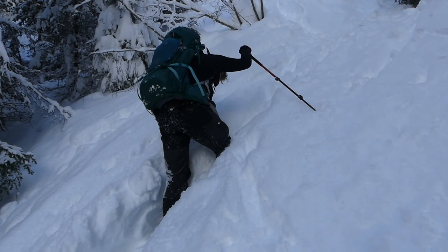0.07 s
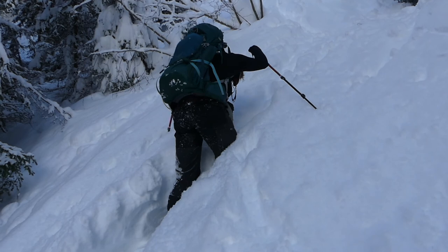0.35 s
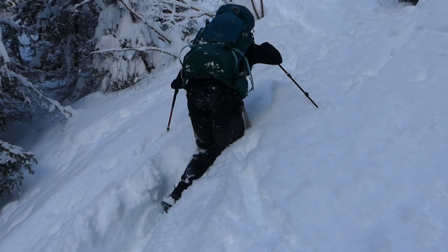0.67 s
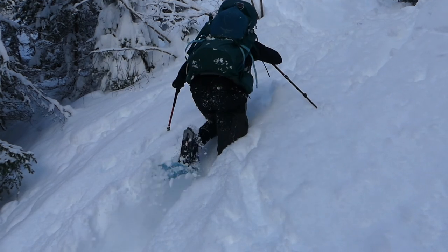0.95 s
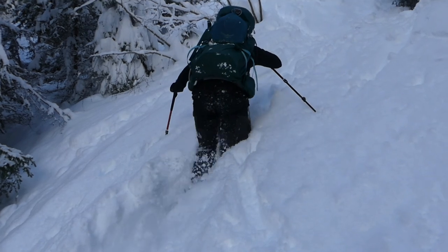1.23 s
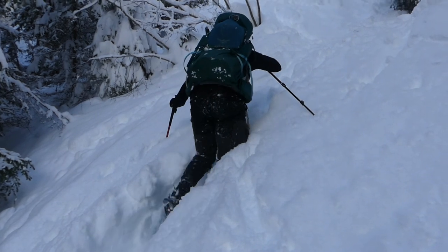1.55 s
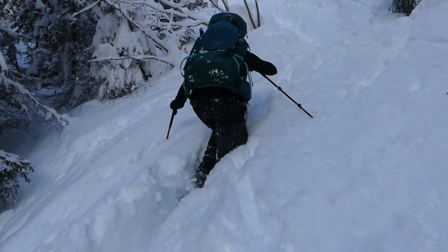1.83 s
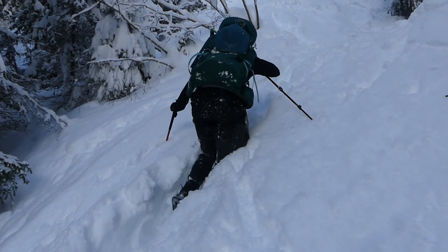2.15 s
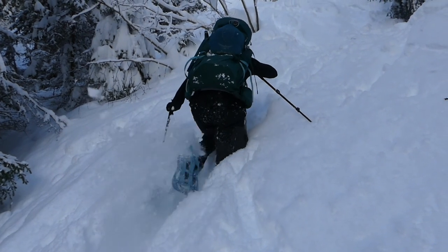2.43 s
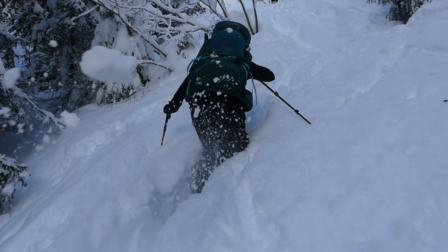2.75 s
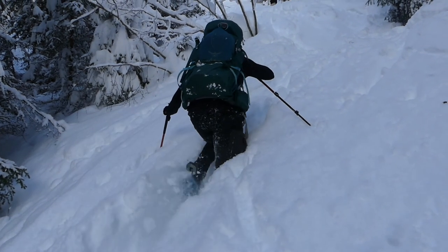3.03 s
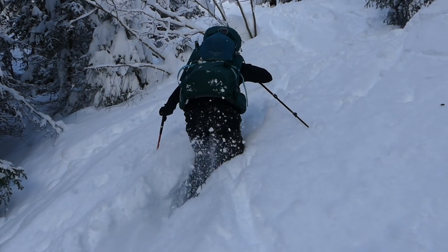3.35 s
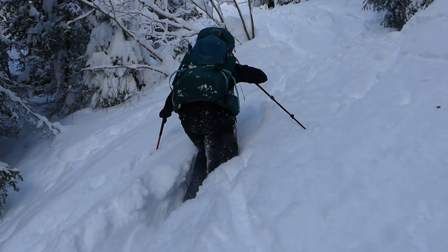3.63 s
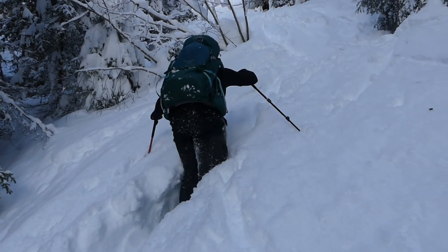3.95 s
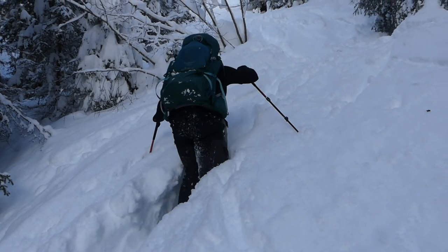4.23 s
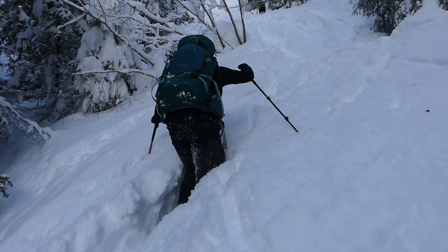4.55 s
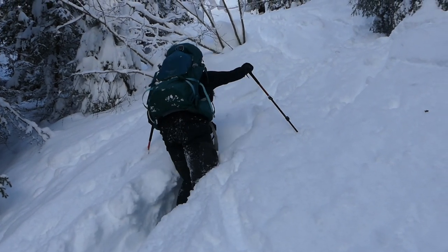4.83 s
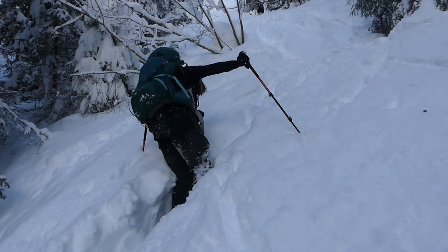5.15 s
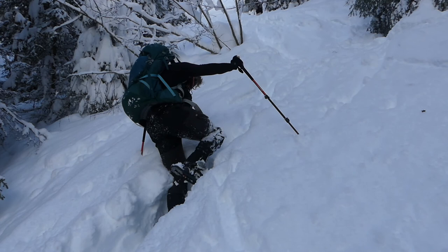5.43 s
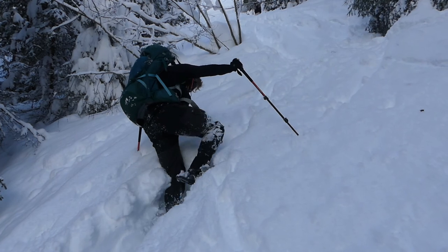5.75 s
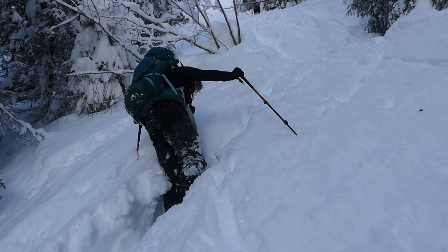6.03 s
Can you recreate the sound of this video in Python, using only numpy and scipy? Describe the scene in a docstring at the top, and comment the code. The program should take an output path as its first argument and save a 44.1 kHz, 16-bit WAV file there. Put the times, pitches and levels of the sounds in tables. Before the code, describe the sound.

In quiet, echoless woods, uneven snowshoe steps pack deep snow and break its crust, sending powder hissing down the slope. Clods land close by with short, crumbly thuds, and snow rubs hollowly on the microphone about a second in. Midway, two lumps strike the microphone's casing in sharp, briefly ringing knocks, the loudest sounds. A couple more strong thuds follow, then the soft crunching continues over a faint, even rush.

```python
"""A deep snow slope in still woods: a hiker on snowshoes climbs a few metres above the camera.
Each step packs the snow with a low crunch, breaks its crust and throws powder that hisses downhill,
all of it countless tiny grains giving way. Kicked-back clods thud and crumble close to the microphone.
Snow rubs along the camera's hollow shell, and later two hard lumps shatter on it and make it ring.
A faint, even rush lies underneath."""
import sys
import numpy as np
from scipy import signal
from scipy.fft import rfft, irfft, next_fast_len
from scipy.io import wavfile
from scipy.ndimage import uniform_filter1d

SR = 44100
rng = np.random.default_rng(int(sys.argv[2]) if len(sys.argv) > 2 else 0)


def digitize_waveform(pressure):
    """Quantize a signal to 16-bit integers and store it at the path in sys.argv[1].

    Rows of a 2-D input are taken as channels; values are limited to [-1, 1].
    """
    field = np.atleast_2d(pressure).T
    bounded = np.clip(field, -1, 1)
    quanta = np.round(bounded * 32767).astype(np.int16)
    wavfile.write(sys.argv[1], SR, quanta)


N = 272979
PADDED = next_fast_len(N, real=True)
HZ = np.arange(PADDED // 2 + 1) * SR / PADDED
T = np.arange(N) / SR
HIT_T = np.arange(4096) / SR  # time axis of one short hit


def undb(db):
    """Decibels to gain."""
    return 10 ** (np.asarray(db) / 20)


def unit(x):
    """Scale to rms 1."""
    return x / np.sqrt(np.mean(x ** 2))


def hit_level(x, db):
    """Scale a hit to the energy of 10 ms at this level."""
    return x * undb(db) * np.sqrt((SR // 100) / np.sum(x ** 2))


def over_hz(hz, points_hz, values):
    """Join points by straight lines on a log-frequency axis."""
    return np.interp(np.log(hz + 1), np.log(points_hz), values)


def colour(x, eq, size=2048):
    """Minimum-phase EQ through (Hz, dB) points, so nothing rings ahead of an attack."""
    hz = np.arange(size // 2 + 1) * SR / size
    cepstrum = irfft(np.log(undb(over_hz(hz, *np.transpose(eq)))))
    cepstrum[1:size // 2] *= 2
    cepstrum[size // 2 + 1:] = 0
    return signal.oaconvolve(x, irfft(np.exp(rfft(cepstrum))))[:len(x)]


def wander(rate_hz):
    """Smooth random modulation with a spread near 1."""
    hold = int(SR / rate_hz)
    stairs = np.repeat(rng.standard_normal(N // hold + 1), hold)
    return 1.2 * uniform_filter1d(stairs, hold)[:N]


def add(track, start, sound):
    """Mix a sound in at a start time in seconds."""
    i = int(start * SR)
    track[i:i + len(sound)] += sound[:N - i]


def envelope(start, length, attack_s, release_s):
    """Rise to full level by the start time, hold, then die away."""
    return np.exp(-np.maximum(start - T, 0) / attack_s - np.maximum(T - start - length, 0) / release_s)


def grains(eq, per_s, spread, flicker_db, flicker_hz):
    """Snow grains give way at random, in uneven bunches: a direct and a diffuse stream."""
    bunches = undb(flicker_db * wander(flicker_hz))
    streams = np.zeros((2, N))
    for stream in streams:
        chance, size = rng.random((2, N))
        breaks = chance < per_s / SR
        push = 2 * size[breaks] - 1
        # a positive spread gives many small grains and few large ones
        stream[breaks] = np.sign(push) * undb(-spread * np.log(np.abs(push) + .02))
    return np.array([unit(bunches * colour(stream, eq)) for stream in streams])


# Tone of the background bed. Each row: frequency in Hz, gain in dB.
STILL_EQ = [(25, -26), (50, -11), (95, 4.5), (160, 6), (300, -0.5), (450, 6.5), (640, -15.5), (740, 0.5),
            (830, 8), (960, -8), (1600, -7.5), (3000, -16.5), (7500, -20), (11000, -18), (16000, -24.5)]


def stillness():
    """Woods and camera give a faint rush with a hollow band near 830 Hz: two unrelated streams."""
    return [undb(db + 0.52 * wander(3.8)) * unit(colour(rng.standard_normal(N), STILL_EQ))
            for db in (-58.5, -57)]


# A snowshoe bears down. Each row: start in seconds, length in seconds, packing snow and
# breaking crust in dB before the mix trims.
TREADS = [(0, 0.14, -58.5, -69), (0.188, 0.063, -52, -59), (0.33, 0.32, -49.5, -56), (0.667, .25, -51, -50),
          (1.036, 0.19, -50, -53), (1.294, 0.26, -51.5, -59.5), (1.684, 0.054, -57.5, -55.5),
          (1.818, 0.5, -51.5, -57.5), (2.58, 0.018, -43, -55.5), (2.69, 0.08, -59, -61),
          (2.836, 0.27, -52.5, -59.5), (3.216, 0.04, -45.5, -52.5), (3.525, 0.14, -74, -61),
          (3.842, 0.16, -53, -60), (4.084, 0.33, -58, -65.5), (4.637, 0.043, -57, -61.5),
          (4.774, 0.29, -51.5, -64.5), (4.855, 0.01, -60, -58), (5.141, 0.23, -52.5, -60.5),
          (5.387, 0.21, -58.5, -55), (5.612, 0.058, -53, -59.5), (5.768, .4, -51.5, -56)]


def treads(sag_db_per_s=3):
    """Power envelopes of packing snow and breaking crust: both ease off as the snowshoe settles."""
    pack, crust = np.zeros((2, N))
    for start, length, pack_db, crust_db in TREADS:
        settling = undb(-sag_db_per_s * np.clip(T - start, 0, length))
        load = envelope(start, length, attack_s=0.034, release_s=0.049) * settling
        pack += (undb(pack_db) * load) ** 2
        crust += (undb(crust_db) * load) ** 2
    return pack, crust


# The four layers of a step: low packing crunch, midrange crust, hissing powder, airy spray.
# Each row: frequency in Hz, gain in dB.
PACK_EQ = [(25, -37), (60, -34), (100, 0.5), (150, -1), (220, 2.5), (320, 1), (500, -7), (800, -15),
           (1400, -35.5)]
CRUST_EQ = [(60, -20), (250, -34), (550, 4.5), (1050, 2), (1300, 0.5), (1500, 0), (2050, -1.5), (2700, -17),
            (3400, -34), (7000, -19)]
POWDER_EQ = [(200, -42), (1200, -14.5), (2600, 1), (3600, -4.5), (4600, 0), (5700, 1.5), (6800, -2),
             (7600, -9.5), (9000, -6), (12000, -23)]
SPRAY_EQ = [(1000, -53), (5000, -20), (8000, -2.5), (9400, -9), (10400, 5), (13200, 1.5), (14500, -3),
            (16000, -11.5)]


def steps():
    """Snow packs with a low crunch, the crust breaks, loosened powder slides and sprays."""
    pack, crust = treads()
    powder, spray = showers()
    crust += undb(-2.5) ** 2 * powder  # bits of crust tumble with the powder
    floor = undb([-65.5, -75.5, -72, -70.5])[:, None]  # trodden snow never quite rests
    trims = undb([-0.17, 2, 2.5, 0])[:, None]
    pack, crust, powder, spray = trims * np.sqrt(np.array([pack, crust, powder, spray]) + floor ** 2)
    return (pack * grains(PACK_EQ, per_s=670, spread=2, flicker_db=1.5, flicker_hz=49)
            + crust * grains(CRUST_EQ, per_s=2200, spread=3, flicker_db=1.24, flicker_hz=60)
            + powder * grains(POWDER_EQ, per_s=11000, spread=2.5, flicker_db=1, flicker_hz=70)
            + spray * grains(SPRAY_EQ, per_s=16000, spread=-1, flicker_db=2.1, flicker_hz=70))


def crumble(eq, decay_s, db):
    """A lump collapses in a quickly fading burst of tiny fractures."""
    fractures = rng.choice([-1, 1], len(HIT_T)) * np.exp(-HIT_T / max(decay_s, .0004))
    # flatten the burst's spectrum, so the snow's EQ sets the timbre
    power = uniform_filter1d(np.abs(rfft(fractures)) ** 2, size=40)[1:]
    band_hz = np.arange(1, len(power) + 1) * SR / len(HIT_T)
    flat = colour(fractures, np.column_stack([band_hz, -10 * np.log10(power)]))
    return hit_level(colour(flat, eq), db)


# The weight of a thud. Each row: frequency in Hz, gain in dB.
THUD_EQ = [(20, -48), (45, -11), (75, 13), (120, 2.5), (700, 10), (1500, -9)]


def thud(hz, decay_cycles, db):
    """A soft mass stops: the surface dips and swings back once or twice."""
    cycles = hz * HIT_T
    swing = -np.sin(2 * np.pi * cycles) * cycles * np.exp(-cycles / decay_cycles)
    return hit_level(colour(swing, THUD_EQ), db)


# Clods land close by. Each row: start in seconds, thud level in dB, thud pitch in Hz,
# crunch level in dB, grit level in dB before its trim, crumbling time in seconds.
CLODS = [(.211, -40.5, 231, -45, -60.5, 0.0035), (0.673, -37, 198, -46, -80, 0.0083),
         (.689, -31, 200, -32, -65, 0.0038), (0.745, -45, 220, -43, -87, 0.0029),
         (.97, -54, 400, -48, -53, .003), (1.0438, -38.5, 287, -39.5, -56, 0.0019),
         (1.3582, -38, 271, -68, -71, 0.0011), (1.507, -41, 266, -61.5, -77, 0.0024),
         (1.5153, -44, 107, -52, -85, 0.0017), (1.781, -46.5, 494, -52, -80, .0014),
         (1.829, -43.5, 480, -52, -52, 0.0055), (2.135, -45.5, 206, -69, -64, .004),
         (2.199, -44.5, 302, -46, -70, 0.002), (2.576, -36, 223, -64, -56, 0.0031),
         (2.594, -49, 110, -61, -54, .011), (2.663, -46, 158, -49, -96, 0.0019),
         (2.8894, -45, 290, -44.5, -60, 0.01), (2.943, -51, 370, -47.5, -59, .0029),
         (2.966, -40.5, 498, -50, -48.5, 0.0055), (2.982, -41, 373, -35, -44.5, 0.0081),
         (2.994, -40, 290, -40, -55, 0.0013), (3.038, -44, 523, -51.5, -64, 0.0016),
         (3.2424, -29.5, 250, -34, -47, 0.0024), (3.2493, -34.5, 134, -59, -58, 0.001),
         (3.303, -60, 250, -64, -57.5, .002), (3.8123, -50, 416, -50, -64, 0.0012),
         (3.8577, -26, 303, -37, -43.5, 0.0018), (4.2683, -56, 280, -62, -64, 0.0049),
         (4.942, -38.5, 252, -82, -79, 0.004), (5.047, -49.5, 201, -76, -81, .002),
         (5.366, -52, 490, -56, -86, 0.0011), (5.649, -60, 200, -70, -56, 0.004),
         (6.1386, -38.5, 390, -52.5, -61, 0.0053)]
# Tone of a clod's crunch. Each row: multiple of the crunch pitch, gain in dB.
CRUNCH_SHAPE = [(.03, -32), (.15, -20.5), (.3, 0), (.55, 2), (.75, 2), (1, 5), (1.2, -1.5), (1.4, -10.5),
                (1.8, -27), (4, -41)]
# The bright grit it sheds. Each row: frequency in Hz, gain in dB.
GRIT_EQ = [(200, -22), (1200, -2), (2600, -29), (3700, 0), (5400, -1), (6500, -0.5), (7600, -13.5),
           (13000, -27), (16000, -34)]


def clods(base_hz=2750, grit_db_per_octave=54.5, grit_trim_db=2.5):
    """Each clod crunches on contact, higher the grittier it is, sheds grit and thuds as it stops."""
    out = np.zeros(N)
    for start, thud_db, thud_hz, crunch_db, grit_db, crumble_s in CLODS:
        crunch_hz = base_hz * 2 ** ((grit_db - crunch_db) / grit_db_per_octave)
        crunch_eq = [(multiple * crunch_hz, db) for multiple, db in CRUNCH_SHAPE]
        add(out, start, crumble(crunch_eq, crumble_s, crunch_db))
        add(out, start, crumble(GRIT_EQ, crumble_s, grit_db + grit_trim_db))
        decay_cycles = 0.18 + 0.47 * thud_hz * crumble_s  # a slow collapse pushes for longer
        add(out, start, thud(thud_hz, decay_cycles, thud_db))
    return out


# Kicked powder slides downhill. Each row: start in seconds, length in seconds, midway level in dB,
# swell in dB per second, spray offset in dB. Levels come before the mix trims.
SHOWERS = [(0.337, 0.65, -59.5, 24, -3), (1.044, 0.23, -51.5, -21, 1.5), (1.659, .1, -63.5, -12, -4),
           (1.829, .1, -54, -25, 2), (2.005, .05, -61.5, -10, -4), (2.183, 0.15, -59, 54, 2.5),
           (2.426, .19, -54.5, 28, 3), (2.846, 0.013, -57, 0, 3.5), (2.89, 0.044, -59, -12, -1),
           (2.968, 0.022, -50, -10, -3), (3.063, 0.2, -55, 13, -0.5), (3.208, 0.047, -60.5, -8, 1),
           (3.56, 0.058, -66.5, -10, -9), (3.817, 0.084, -62, -5, -13), (4.635, .05, -70, -10, -4),
           (5.307, 0.19, -67, 15, 0), (5.525, 0.14, -60, 19, 1.5), (5.731, 0.2, -59.5, 2, 0),
           (6.102, 0.071, -61.5, -8, 1)]


def showers(attack_s=0.021):
    """Power envelopes of powder and fine spray: a shower swells or thins, then leaves a trickle."""
    powder, spray = np.zeros((2, N))
    for start, length, db, swell_db_per_s, spray_db in SHOWERS:
        age = np.clip(T - start, 0, length)
        slide = envelope(start, length, attack_s, release_s=0.018)
        trickle = undb(-8) * envelope(start, length, attack_s, release_s=0.25)  # stragglers roll on
        flow = np.maximum(slide, trickle) * undb(db + swell_db_per_s * (age - length / 2))
        spent_db = np.minimum(44 * age, 4.5)  # the finest dust arrives first and is soon spent
        powder += flow ** 2
        spray += (flow * undb(spray_db - spent_db)) ** 2
    return powder, spray


# Fader ride of the snow rubbing on the camera. Each row: time in seconds, level in dB.
RUB_FADER = [(.66, -66), (.70, -42), (.76, -42.5), (.83, -52), (.95, -54.5), (1.1, -52.5), (1.25, -74)]
# The shell's hollow resonances. Each row: frequency in Hz, bandwidth in Hz, gain in dB.
SHELL_MODES = [(203, 84, 5), (1150, 87, -1), (1503, 34, 8.5), (1590, 45, 0), (1820, 51, 2), (1970, 40, 0),
               (2550, 60, -9)]


def rub():
    """Snow slides along the camera: a dense run of slips keeps the shell resonating."""
    shell = sum(undb(db) / (1 + 1j * (HZ ** 2 - hz ** 2) / (width * HZ + 1))
                for hz, width, db in SHELL_MODES)
    slip_eq = [(100, -19), (200, 2.5), (2400, -3.5), (3500, -21)]
    slips = grains(slip_eq, per_s=2300, spread=1.5, flicker_db=1.5, flicker_hz=73)
    scrape = unit(irfft(rfft(slips, PADDED) * shell, PADDED)[:, :N])
    return scrape * undb(np.interp(T, *np.transpose(RUB_FADER), left=-np.inf, right=-np.inf))


# Hard lumps hit the camera. Each row: start in seconds, ring level in dB, shatter level in dB,
# shatter time in seconds, crumb level in dB, thud level in dB.
KNOCKS = [(2.477, -19, -25.5, 0.0048, -34.5, -35.5), (3.1005, -21.5, -20, 0.0018, -34, -36.5)]
# The camera body's ring. Each row: frequency in Hz, seconds to fall 60 dB, relative weight in dB
# where the first lump lands, the same for the second.
BODY_MODES = [(273, 0.043, -1, -5), (531, 0.026, 2, -4.5), (830, 0.066, -4.5, -13), (1190, 0.036, 5.5, 2),
              (1490, 0.026, -25, -32), (1570, 0.059, -19, -2.5), (1900, 0.029, -3, -6.5),
              (2105, 0.07, -12, -9), (2195, 0.024, -1, -9), (2460, 0.048, -17, -16.5),
              (2930, 0.0092, -6.5, -8), (3590, 0.018, -32, -11.5), (4400, 0.043, -15, -9),
              (4940, 0.022, -8, 3), (5450, 0.022, -4, -5.5), (6090, 0.016, -5.5, -4)]
# Tone of a shattering lump. Each row: frequency in Hz, gain in dB.
SHATTER_EQ = [(50, -25), (200, 4), (550, 4.5), (750, 2), (980, -14.5), (1400, 7.5), (2000, -1.5),
              (2350, -6), (3400, 0), (4000, -5), (5200, 0), (6200, -1), (7300, -10), (9300, -25),
              (10200, -11), (13000, -20), (16000, -21)]


def knocks(rebound_s=0.0089, scatter_s=0.017):
    """A hard lump shatters, jolts the camera and rings its body; the crumbs patter just after."""
    out = np.zeros(N)
    hz, t60, *spots = np.transpose(BODY_MODES)
    decays = np.exp(-np.log(1000) * np.outer(1 / t60, HIT_T))
    rings = np.sin(2 * np.pi * np.outer(hz, HIT_T)) * decays / np.sqrt(t60)[:, None]
    lag_s = .0022 / (1 + hz / 1300)  # the lump flattens as it breaks, pushing the low modes later
    for (start, ring_db, shatter_db, shatter_s, crumbs_db, thud_db), spot_db in zip(KNOCKS, spots):
        body = np.zeros(N)
        for k, (ring, db) in enumerate(zip(rings, spot_db)):
            add(body, start + lag_s[k], (-1) ** k * undb(db) * ring)
        out += hit_level(body, ring_db)
        add(out, start, crumble(SHATTER_EQ, shatter_s, shatter_db))
        add(out, start, thud(hz=315, decay_cycles=0.51, db=thud_db))
        add(out, start + rebound_s, crumble(SHATTER_EQ, scatter_s, crumbs_db))
    return out


# The stereo image. Each row: frequency in Hz, left minus right in dB, left's phase lead in radians.
STEREO_IMAGE = [(40, 12, -0.72), (130, 11, 0.31), (300, 9.5, -1.35), (820, 6, -0.55), (1340, 4.5, -1.22),
                (1920, 1, -0.46), (3200, 1.3, -0.65), (5570, 0.5, 0), (12000, 0.2, 0.61)]


def microphones(direct, diffuse):
    """The microphone pair: lows lean left, and diffuse sound differs between the sides for width."""
    hz, balance_db, lead = np.transpose(STEREO_IMAGE)
    lean = undb(over_hz(HZ, hz, balance_db)) * np.exp(1j * over_hz(HZ, hz, lead))
    left_gain = 2 / (1 + 1 / np.abs(lean))
    spectra = rfft([direct + diffuse, direct - diffuse], PADDED)
    return irfft(spectra * [left_gain, left_gain / lean], PADDED)[:, :N]


def scene():
    """Snow swallows all echoes: close hits are dry, the steps and the rub spread a little."""
    direct, diffuse = steps() + rub()
    hush, hush_wide = stillness()
    return microphones(direct + clods() + knocks() + hush, undb(-8) * diffuse + hush_wide)


def record(dry):
    """The camera cuts the top end steeply at 15.9 kHz."""
    return signal.sosfilt(signal.ellip(10, .2, 80, 15900, fs=SR, output="sos"), dry)


dry = scene()
out = record(dry)
digitize_waveform(out)
```